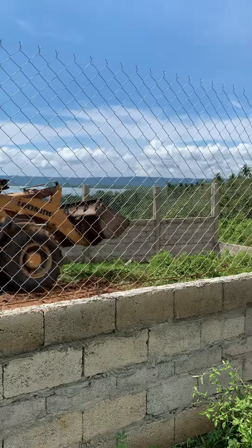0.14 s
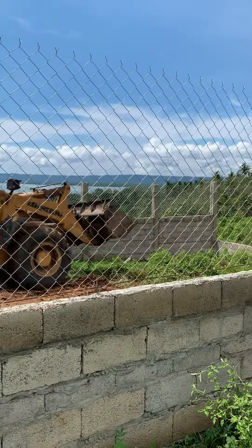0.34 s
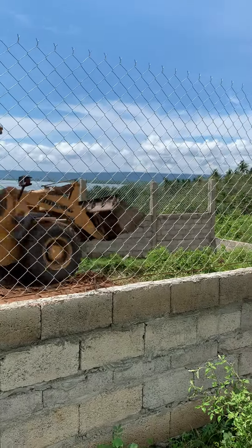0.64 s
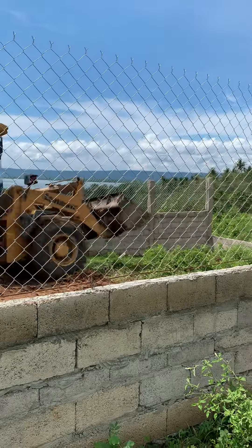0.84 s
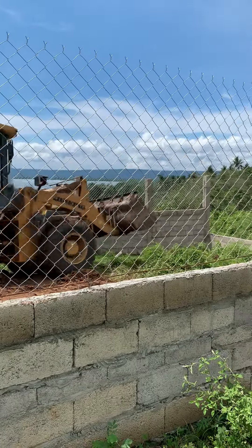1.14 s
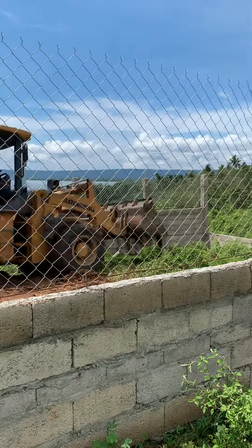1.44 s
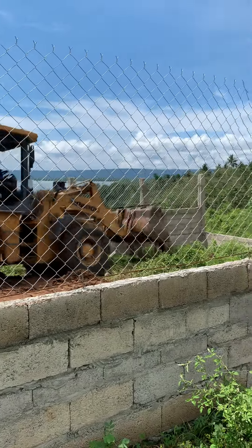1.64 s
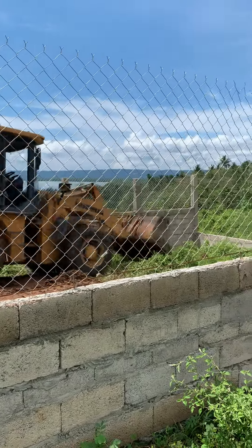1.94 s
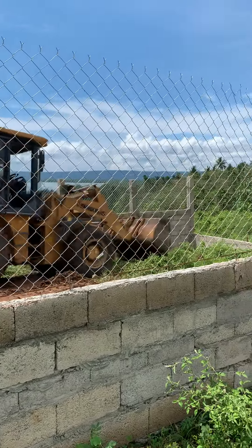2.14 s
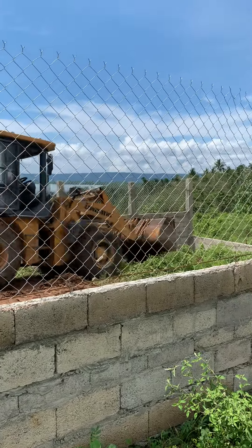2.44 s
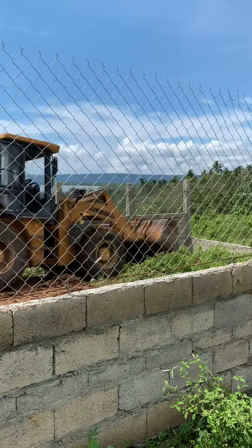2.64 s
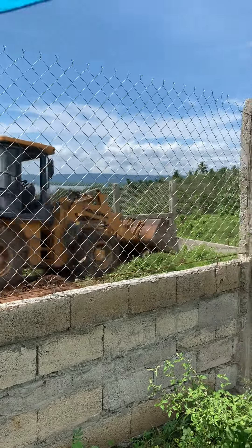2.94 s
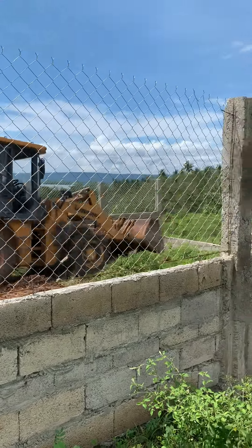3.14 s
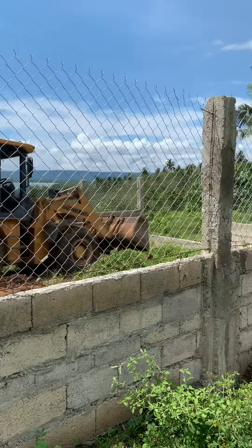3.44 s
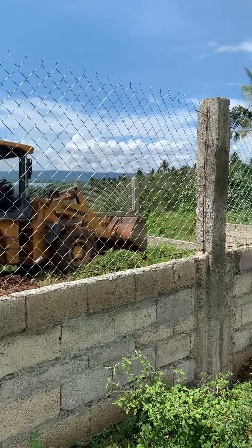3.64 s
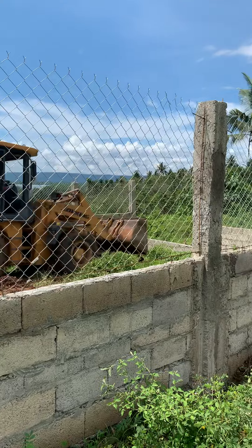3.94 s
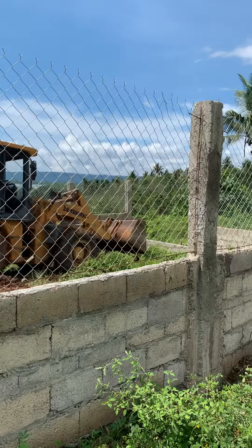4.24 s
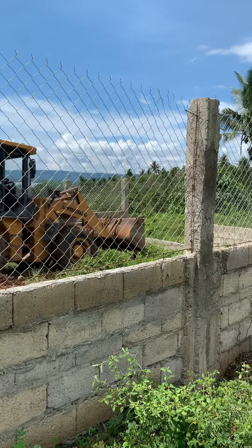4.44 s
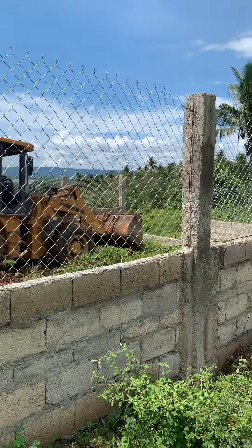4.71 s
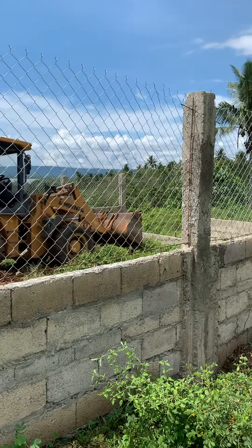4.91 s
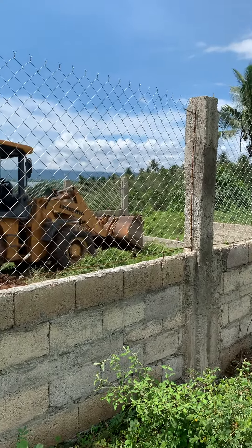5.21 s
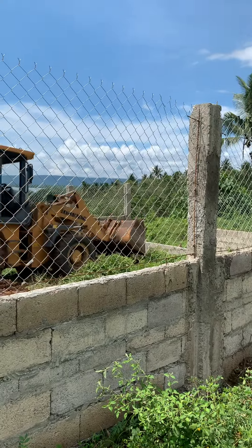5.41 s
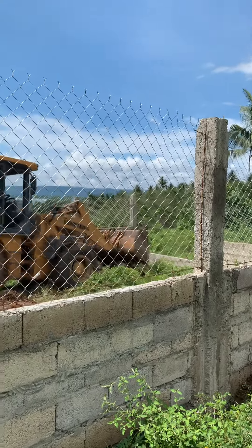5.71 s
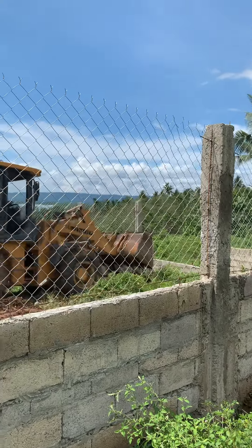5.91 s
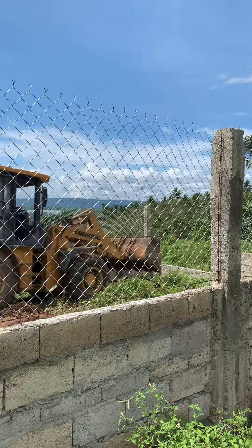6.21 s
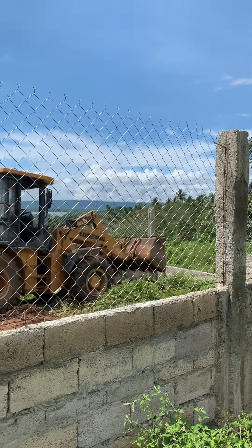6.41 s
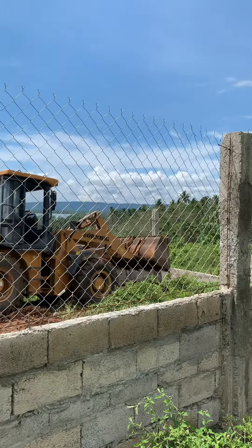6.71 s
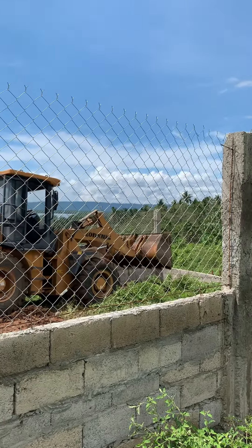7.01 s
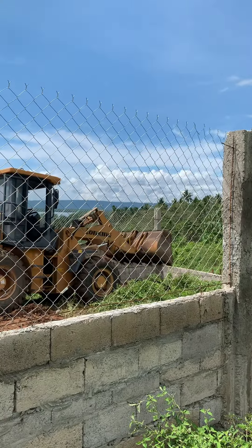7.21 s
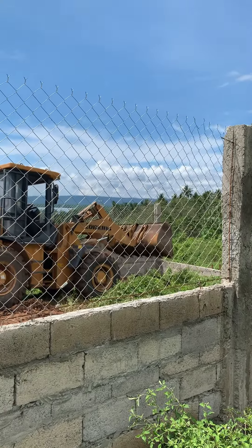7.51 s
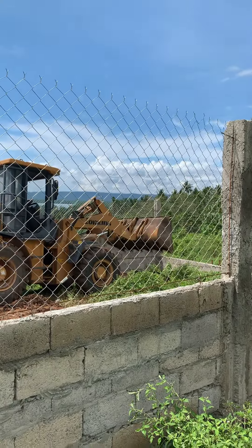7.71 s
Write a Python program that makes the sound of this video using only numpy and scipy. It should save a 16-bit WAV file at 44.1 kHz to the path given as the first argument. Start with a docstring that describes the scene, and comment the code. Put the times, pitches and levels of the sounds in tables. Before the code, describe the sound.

A large six-cylinder diesel works continuously in the open air, heard from across a fence. It begins at a firm drone, loses speed around a short burst of loose steel knocking and low frame thuds, and settles into a rough, quieter idle. Throttle bursts follow, each swelling with boom and whoosh, dropping back between them, until the engine holds fast and hissy. Small dull ticks come irregularly.

```python
"""The six-cylinder diesel of a loader drones at its changing firing rate, a little to the left.
Sines make the exhaust tones; noise pulsed by the firings makes body rumble, roar, clatter and fan hiss.
Whoosh and boom swell as the engine gains speed. The bucket linkage rattles and clanks once: struck modes
under cracks of noise. Ticks are puffs of noise; thuds are struck low modes of the frame."""
import sys
import numpy as np
from scipy import signal
from scipy.fft import rfft, irfft
from scipy.io import wavfile
from scipy.ndimage import uniform_filter1d

SR = 44100
rng = np.random.default_rng(int(sys.argv[2]) if len(sys.argv) > 2 else 0)


def inscribe(sig):
    """Save sig as 16-bit PCM at rate SR to the path in sys.argv[1].

    A 1-D sig is mono; a 2-D sig holds one channel per row.
    Samples are clipped to [-1, 1] before scaling.
    """
    pcm = np.round(np.clip(np.atleast_2d(sig).T, -1, 1) * 32767)
    wavfile.write(sys.argv[1], SR, pcm.astype(np.int16))


N = 346626


def from_db(db):
    """Decibels to gain."""
    return 10 ** (np.asarray(db) / 20)


def rms_one(x):
    """Scales to rms 1, all layers by one factor."""
    return x / np.sqrt(np.mean(x ** 2) + 1e-20)


def in_time(rows):
    """A (s, value) table read at every sample."""
    s, value = np.transpose(rows)
    return np.interp(np.arange(N) / SR, s, value)


def on_bins(points):
    """A (Hz, value) table read at every FFT bin, straight over log frequency."""
    hz, value = np.transpose(points)
    bin_hz = np.fft.rfftfreq(N, 1 / SR)
    return np.interp(np.log(bin_hz + 1), np.log(hz + 1), value)


def noise():
    """Two independent layers of white noise: centre and side."""
    return rng.standard_normal((2, N))


def colour(x, spectrum):
    """Shapes a noisy signal by a spectrum; rms 1."""
    return rms_one(irfft(rfft(x) * from_db(on_bins(spectrum)), N))


def drift(rate_hz):
    """Slow random wander of rms 1: noise through a double pole, run at 1/40 of the sample rate."""
    step, settle = 40, 2000
    r = np.exp(-2 * np.pi * rate_hz * step / SR)
    white = rng.standard_normal(N // step + settle + 2)
    slow = rms_one(signal.lfilter([1], [1, -2 * r, r * r], white)[settle:])
    return np.interp(np.arange(N) / step, np.arange(len(slow)), slow)


def band(x, order, low_hz, high_hz):
    """Butterworth band-pass."""
    return signal.sosfilt(signal.butter(order, [low_hz, high_hz], "band", fs=SR, output="sos"), x)


def ring(x, hz, t60_s):
    """Two-pole mode: a unit click sets off a decaying sine of height 1."""
    r, w = from_db(-60 / (t60_s * SR)), 2 * np.pi * hz / SR
    return signal.lfilter([0, np.sin(w)], [1, -2 * r * np.cos(w), r * r], x + 1e-18)


def clicks(times_s, gains):
    """A train of single-sample blows."""
    out = np.zeros(N)
    out[np.round(np.asarray(times_s) * SR).astype(int)] = gains
    return out


def puffs(times_s, gains, contact_s, t60_s):
    """Each blow presses for a moment, then its puff of noise dies away."""
    size = int(contact_s * SR)
    pressed = np.convolve(clicks(times_s, gains), np.ones(size) / size)[:N]
    envelope = signal.lfilter([1], [1, -from_db(-60 / (t60_s * SR))], pressed + 1e-18)
    return envelope * noise()


# Dull thuds of the frame. Each row: start in s, level before the band-pass in dB, pitch in Hz, t60 in s.
THUD_ROWS = [(0.567, -12.5, 291, 0.099), (1.939, -9, 75.5, 0.06), (1.976, -11.5, 78.4, .15),
             (4.47, -18.5, 199, 0.068), (4.495, -11.5, 138, 0.026), (1.601, -18, 246, 0.24),
             (1.83, -23.5, 486, 0.35), (4.489, -19.5, 336, 0.074), (4.489, -22, 536, 0.087),
             (6.211, -23, 149, 0.14), (6.44, -21, 305, .15), (6.46, -25, 195, 0.22),
             (7.09, -23.5, 157, 0.16)]


def frame_thuds():
    """Soft blows, each ringing one low mode."""
    out = sum(ring(clicks([s], from_db(db)), hz, t60_s) for s, db, hz, t60_s in THUD_ROWS)
    return band(out, 2, 45, 600)


# Engine block and covers. Each row: resonance in Hz, width in Hz, lift in dB,
# change of lift at the start in dB, fading out over ROLLING_IN_S while the loader rolls in.
BLOCK_MODES = [(520, 50, 3, 0), (783, 64, 3, -0.5), (1180, 50, 3, 0), (1345, 35, 5, 0), (1400, 35, 5, 2),
               (1455, 30, 3, 0), (1766, 30.4, 10.5, -6), (1830, 60, 4, -2), (1945, 40, 5, -4),
               (2230, 70, 5, -3), (2434, 11, 5, 0), (2510, 170, 7, -4), (2810, 60, 5, 0), (3030, 170, 6, 0),
               (3800, 130, 3, -2), (5300, 600, 4, -3)]
ROLLING_IN_S = 3.1


def block(x):
    """The engine block and covers lift their resonances, each one wavering."""
    out = x.copy()
    rolling = np.clip(1 - np.arange(N) / SR / ROLLING_IN_S, 0, 1)
    for hz, width_hz, db, early_db in BLOCK_MODES:
        r = np.exp(-np.pi * width_hz / SR)
        a = [1, -2 * r * np.cos(2 * np.pi * hz / SR), r * r]
        mode = signal.lfilter([(1 - r * r) / 2, 0, (r * r - 1) / 2], a, x)
        lift = from_db(db + early_db * rolling) - 1
        out += lift * from_db(0.84 * drift(11.0)) * mode
    return out


# Sharper ticks. Each row: start in s, body level in dB, bright edge level in dB, both relative.
TICK_ROWS = [(0.218, -36, -45), (0.477, -16, -49), (0.6754, -15.5, -47), (0.98, -28, -50),
             (1.5183, -21, -38), (2.3401, -19, -42), (2.4314, -17.5, -50), (2.536, -19.5, -55),
             (2.672, -22, -53), (2.8782, -20, -47), (3.571, -22, -34), (4.4573, -19, -50),
             (4.706, -20.5, -38), (4.815, -19, -39), (4.905, -17, -39), (5.1228, -24, -46),
             (5.214, -16.5, -44), (5.403, -14, -39), (5.4897, -17, -36), (5.556, -14.5, -36),
             (5.7934, -18, -40), (5.915, -17, -45), (6.4068, -28, -37), (6.7012, -18, -45),
             (7.0424, -15, -44)]


def ticks():
    """Soft-fronted puffs of noise coloured by the block, each with a bright edge of its own level."""
    s, body_db, edge_db = np.transpose(TICK_ROWS)
    body = puffs(s, from_db(body_db - 1.5), contact_s=0.004, t60_s=0.13)
    edge = puffs(s, from_db(edge_db + 6), contact_s=0.0049, t60_s=0.053)
    return block(band(body, 1, 1000, 2400)) + band(edge, 2, 6000, 13000)


# Bucket linkage knocking on its pins. Each row: start in s, relative level in dB,
# lift of the modes below 1000 Hz in dB, lift of those above 4600 Hz in dB.
CLANK_ROWS = [(1.7144, -23, 5, -4), (1.728, -21, 6, -8), (1.745, -21, 4, -5), (1.755, -27, 6, -6),
              (1.7713, -23, 2, -4), (1.7835, -20, 3, -8), (1.7997, -17.5, 0, -3), (1.8268, -16.5, -3, 0),
              (1.8395, -28, -3, 2), (1.926, -28, -10, -4), (1.9338, -16, -10, -1), (1.944, -27, -6, -4)]
# Steel modes of the linkage. Each row: pitch in Hz, relative level in dB, t60 in s.
LINKAGE_MODES = [(650, -6, .06), (760, -3, .09), (1215, -9, .04), (1405, -7, .05), (1560, -8, .04),
                 (2015, -1, .065), (2191, -3, .045), (2450, -2, .055), (2650, -6, .045), (2900, -7, .04),
                 (3350, -8, .04), (3800, -7, .034), (4420, -2, .035), (5100, -11, .02), (5730, -4, .04),
                 (6500, -2, .01), (6880, -12, .04), (7750, -16, .03), (8800, -16, .02), (10500, -18, .02),
                 (11200, -15, .025), (13100, -17, .022), (14800, -21, .015)]
SPREAD_CYCLES = 10   # a mode takes up a knock within this many of its cycles


def linkage():
    """Each knock strikes the steel modes, high ones tending to speak first, under a short broad crack."""
    s, knock_db, low_db, high_db = np.transpose(CLANK_ROWS)
    crack = puffs(s, from_db(knock_db - 7), contact_s=.001, t60_s=.07)
    out = band(crack, 1, 700, 5000)
    for hz, db, t60_s in LINKAGE_MODES:
        strength_db = knock_db + db + low_db * (hz < 1000) + high_db * (hz > 4600)
        for layer in out:   # centre, side
            late, uneven, sign = rng.uniform(-1, 1, (len(s), 3)).T
            start_s = s + (1 + late) / 2 * SPREAD_CYCLES / hz
            blows = np.sign(sign) * from_db(strength_db + 2 * uneven)
            layer += ring(clicks(start_s, blows), hz, t60_s)
    return out


# Load on the engine; only its swing about the mean is used. Each row: time in s, load as noise level in dB.
LOAD_CURVE = [(0, -26.5), (1.07, -27.5), (1.33, -26.5), (1.55, -23.5), (1.8, -25.5), (2.08, -27),
              (2.39, -28.5), (2.65, -30.5), (3.0, -30.5), (3.45, -30), (3.75, -30.5), (3.84, -27),
              (4.2, -29.5), (4.5, -27), (4.62, -29.5), (4.75, -26), (5.2, -29), (5.5, -23.5), (5.75, -26),
              (6.1, -29), (6.46, -24), (6.8, -26.5), (7.16, -26), (7.86, -25.5)]
# Tilt of the engine noise from rumble toward treble. Each row: time in s, tilt in dB before each share.
TILT_CURVE = [(0, -3), (1.3, -3), (2, 1.5), (3, 0), (4.5, -1), (5.3, 1.5), (6, 2.5), (6.5, 2), (7, 3.5),
              (7.86, 4)]


def noise_level_db(mean_load_db, load_share, tilt_share):
    """Level of one engine noise: each follows load and tilt by its own share."""
    load_db = in_time(LOAD_CURVE)
    return mean_load_db + load_share * (load_db - load_db.mean()) + tilt_share * in_time(TILT_CURVE)


# Strength of each cylinder's knock, in firing order. Each entry: relative level in dB.
CYLINDER_KNOCK_DB = [0, 4, 2, 5, 1, -3]


def knock_gate(firings, depth, spread_db, fall_per_firing):
    """Each firing opens the noise and lets it fall, with a strength of its own."""
    count = firings.astype(int)
    total = count[-1] + 1
    strength_db = np.resize(CYLINDER_KNOCK_DB, total) + spread_db * rng.uniform(-1.5, 1, total)
    fall = np.exp(-fall_per_firing * (firings - count))
    return uniform_filter1d(1 + depth * from_db(strength_db[count]) * fall, size=110)


# Fan hiss spectrum. Each row: frequency in Hz, relative density in dB.
FAN_SPECTRUM = [(1500, 2.5), (4000, 11.5), (6000, 8.5), (8000, 5.5), (11000, 1.5), (12500, -0.5),
                (13400, -2), (14200, -18), (15700, -7)]


def fan_hiss(firings):
    """Bright noise, lightly pulsed by the firings."""
    knocks = knock_gate(firings, depth=0.22, spread_db=13.0, fall_per_firing=1.9)
    level_db = noise_level_db(-39, load_share=0.78, tilt_share=0.71)
    return from_db(level_db + 0.69 * drift(23.0)) * colour(noise() * knocks, FAN_SPECTRUM)


def gaining_speed(rate, rumble_db, clatter_db):
    """Intake whoosh and boom: two noise-driven resonances that swell as the engine gains speed."""
    gain_per_s2 = np.clip(uniform_filter1d(np.gradient(rate) * SR, size=11000), 0, 30)   # firings per s, per s
    whoosh_db = clatter_db - 18 + .32 * gain_per_s2 + 1.5 * drift(8)
    boom_db = rumble_db - 18.5 + 0.62 * gain_per_s2 + 1.0 * drift(8)
    whoosh = from_db(whoosh_db) * rms_one(ring(noise(), 5500, .002))
    return whoosh + from_db(boom_db) * rms_one(ring(noise(), 319, 0.021))


# Combustion clatter spectrum, before the block. Each row: frequency in Hz, relative density in dB.
CLATTER_SPECTRUM = [(800, -46), (1000, -3), (1200, 3.5), (1600, 2), (2200, -0.5), (2700, -9), (3300, -10),
                    (4000, -10), (5300, -9.5), (6500, -23.5), (9000, -52)]


def combustion_clatter(knocks, level_db):
    """Noise pulsed by the knocks, coloured by the block."""
    return from_db(level_db + 1.0 * drift(6.7)) * rms_one(block(colour(noise() * knocks, CLATTER_SPECTRUM)))


# Roar spectrum, before the block. Each row: frequency in Hz, relative density in dB.
ROAR_SPECTRUM = [(250, -47), (430, -10.5), (500, -8), (600, -5.5), (850, -4), (980, -16), (1300, -39.5)]


def body_roar(knocks):
    """Mid-band noise pulsed by the knocks, coloured by the block."""
    level_db = noise_level_db(-33.5, load_share=1.3, tilt_share=-0.42)
    return from_db(level_db + 1.4 * drift(7.9)) * rms_one(block(colour(noise() * knocks, ROAR_SPECTRUM)))


# Body rumble spectrum. Each row: frequency in Hz, relative density in dB.
RUMBLE_SPECTRUM = [(20, -26), (38, -6), (60, 10), (90, 4.5), (130, -13), (200, 2), (330, 1), (375, 0),
                   (430, -20), (700, -46)]


def body_rumble(knocks, level_db):
    """Low noise, pulsed by the root of the knocks."""
    return from_db(level_db + 3.9 * drift(11.4)) * colour(noise() * np.sqrt(knocks), RUMBLE_SPECTRUM)


# Firing tone; swells under throttle, drops out when the fuel is cut. Each row: time in s, mean rms level in dB.
FIRING_TONE = [(0.0, -24), (0.04, -23.5), (0.65, -29.5), (1.09, -22), (2.49, -19.5), (2.6, -36),
               (3.11, -31), (3.17, -41), (3.22, -30), (3.85, -28.5), (3.98, -21), (4.49, -25.5),
               (4.51, -19), (4.6, -30), (4.75, -17), (5.34, -21.5), (5.51, -14), (5.69, -17.5), (5.76, -27),
               (5.82, -17.5), (5.93, -17.5), (6.06, -32), (6.11, -27), (6.41, -13.5), (6.65, -21.5),
               (7.86, -25)]
# Its octave, strong at low idle and top speed. Each row: time in s, level in dB re the firing tone.
FIRING_OCTAVE = [(0, -28), (.9, -24), (1.1, -17), (1.6, -23), (2.3, -20), (2.9, -3.5), (3.6, -13),
                 (4.2, -13.5), (4.8, -21.5), (6.0, -28), (6.2, -11), (6.4, -38), (6.9, -28), (7.03, -11.5),
                 (7.86, -11)]
# Growl of uneven cylinders. Each row: frequency in Hz, relative level in dB of a tone there.
GROWL_SPECTRUM = [(70, -19), (110, -11), (155, -6), (210, -8), (330, -10), (425, -20), (520, -12),
                  (800, -13)]
# Stronger growl tones. Each entry: multiple of the six-firing cycle rate.
STRONG_CYCLE_MULTIPLES = [13, 14, 17, 18, 19, 22, 24, 26, 27, 42, 48]
# Extra level of those tones. Each entry: lift in dB.
STRONG_LIFT_DB = [5, 6, 5, 7, 9, 4, 5, 4, 8, 5, 6]
WAVER_DB, IDLE_WAVER_DB, IDLE_FIRINGS_PER_S = .8, 1.8, 49.4   # idle waver adds below this rate


def exhaust(firings, rate, rumble_db):
    """Firing tone and octave as sines, with wavering tones at multiples of the six-firing cycle."""
    mean_db = in_time(FIRING_TONE)
    octave_db = mean_db + in_time(FIRING_OCTAVE) + 2.03 * drift(7.4)
    idling = np.clip((IDLE_FIRINGS_PER_S - rate) / 5, 0, 1)
    tone_db = mean_db + (WAVER_DB + IDLE_WAVER_DB * idling) * drift(9.1)
    out = from_db(tone_db + .6 * drift(9)) * np.sin(2 * np.pi * firings)
    out += from_db(octave_db) * np.sin(4 * np.pi * firings + 1)
    uneven_db = rumble_db - 10.5 + .4 * (rate - 56)   # stands out more at speed
    hz, growl_db = np.transpose(GROWL_SPECTRUM)
    lifts_db = dict(zip(STRONG_CYCLE_MULTIPLES, STRONG_LIFT_DB))
    for multiple in range(7, 60):
        order = multiple / 6   # cycles per firing
        db = uneven_db + np.interp(order * rate, hz, growl_db) + lifts_db.get(multiple, 0) + 3.0 * drift(1.2)
        phase = 2 * np.pi * (order * firings + rng.random()) + .35 * drift(1.2)
        out += from_db(db) * np.sin(phase)
    return np.sqrt(2) * out


# Engine speed. Each row: time in s, firings per s.
SPEED_CURVE = [(0, 63.5), (.7, 63.5), (.95, 61.5), (1.6, 60.5), (1.85, 57.5), (2.5, 54.6), (2.9, 46.3),
               (3.85, 45), (4.1, 49.3), (4.66, 49.7), (4.8, 55.8), (5.0, 55.8), (5.35, 52), (5.6, 64.3),
               (5.76, 61.3), (6.1, 51), (6.27, 50), (6.52, 65.3), (6.85, 66.3), (7.15, 69.5), (7.4, 70.6),
               (7.86, 71.2)]


def engine():
    """One firing count drives exhaust tones and pulsed noises; the exhaust is in the centre layer alone."""
    rate = in_time(SPEED_CURVE)
    firings = np.cumsum(rate) / SR
    knocks = knock_gate(firings, depth=0.6, spread_db=4.0, fall_per_firing=3.0)
    rumble_db = noise_level_db(-34, load_share=0.7, tilt_share=-0.46)
    clatter_db = noise_level_db(-32.5, load_share=1, tilt_share=0.13)
    out = fan_hiss(firings) + gaining_speed(rate, rumble_db, clatter_db)
    out += combustion_clatter(knocks, clatter_db) + body_roar(knocks) + body_rumble(knocks, rumble_db)
    out[0] += exhaust(firings, rate, rumble_db)
    return out


# Phase between the left and right channels. Each row: frequency in Hz, lead of the left in radians.
CHANNEL_PHASE = [(20, -.06), (230, 0), (400, .55), (600, .55), (950, 1.2), (1200, -.2), (1600, .1),
                 (1980, .8), (2330, 2.4), (3100, 2.7), (3800, 1.1), (4850, 3.1), (5650, 3.2), (7700, 6.2),
                 (9500, 6.4), (11400, 9.38), (13600, 9.46), (14700, 12.4), (16000, 12.6)]
# Level between the channels. Each row: frequency in Hz, left minus right in dB.
CHANNEL_BALANCE = [(60, -1), (100, -1.5), (250, -4.5), (330, -4), (420, 0), (700, -1.5), (1070, 3),
                   (1360, 0), (2200, -2.5), (2600, 0), (3300, 3.5), (4200, 0), (16000, 0)]
# Width of the sound. Each row: frequency in Hz, gain of the side layer in dB.
SIDE_GAIN = [(60, -43), (300, -19), (800, -15.5), (1050, -4.5), (1400, -17), (3300, -6.5), (4500, -7),
             (5000, -56), (5500, -15.5), (6500, -2.5), (8500, -29), (10700, -1.5), (12200, -37.5),
             (13400, -41), (14200, -23), (15500, -20)]


def scene():
    """A second, independent layer, opposite in sign left and right, widens the sound by frequency."""
    layers = engine() + ticks() + linkage()
    layers[0] += frame_thuds()
    centre, side = rfft(layers)
    sign = np.array([[1], [-1]])   # left, right
    channels = from_db(sign * on_bins(CHANNEL_BALANCE) / 2) * np.exp(.5j * sign * on_bins(CHANNEL_PHASE))
    return irfft(channels * (centre + sign * from_db(on_bins(SIDE_GAIN)) * side), N)


CUTOFF_HZ = 15750


def record(dry):
    """The deep bass rolls off below 30 Hz, the top is cut steeply."""
    dry = signal.sosfilt(signal.butter(2, 30, "high", fs=SR, output="sos"), dry)
    return signal.sosfilt(signal.ellip(12, .3, 80, CUTOFF_HZ, fs=SR, output="sos"), dry)


dry = scene()
out = record(dry)
inscribe(out)
```